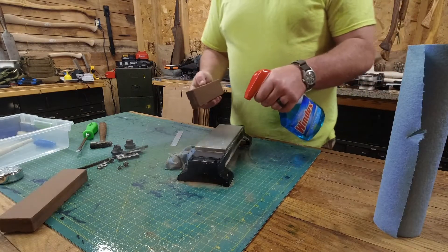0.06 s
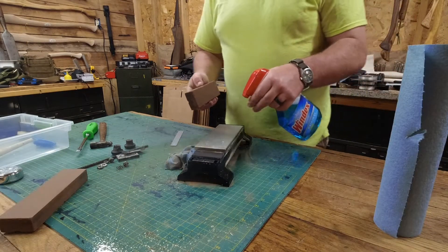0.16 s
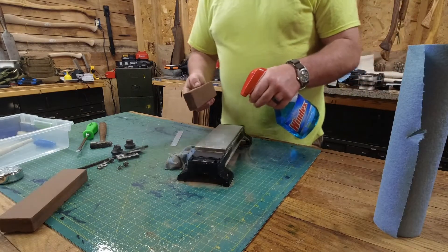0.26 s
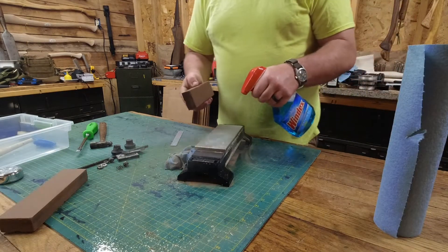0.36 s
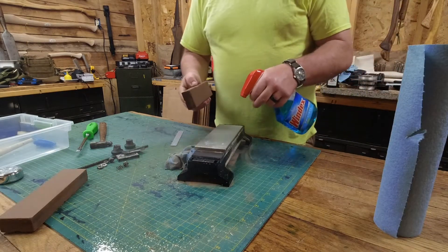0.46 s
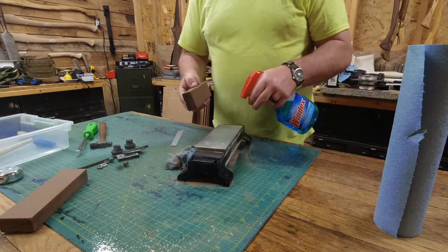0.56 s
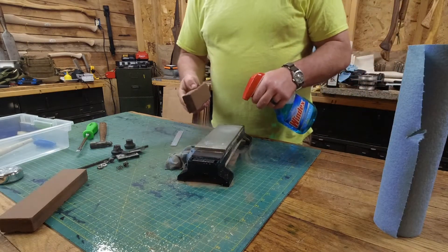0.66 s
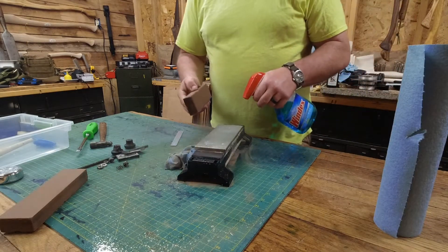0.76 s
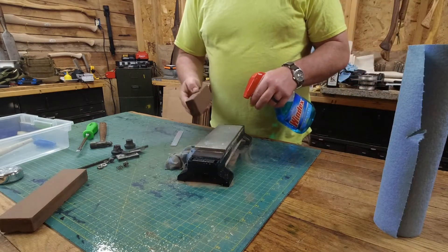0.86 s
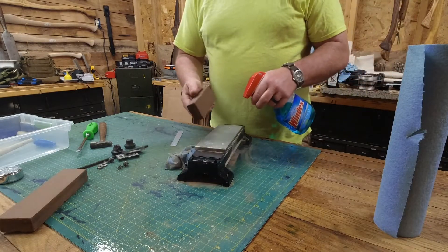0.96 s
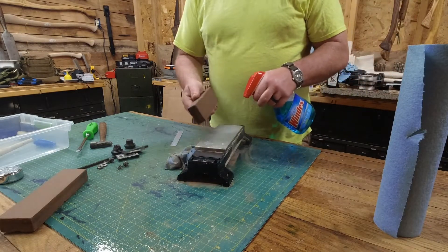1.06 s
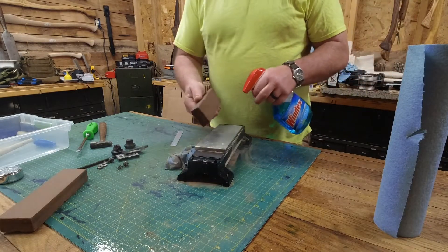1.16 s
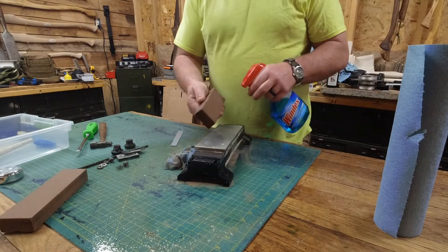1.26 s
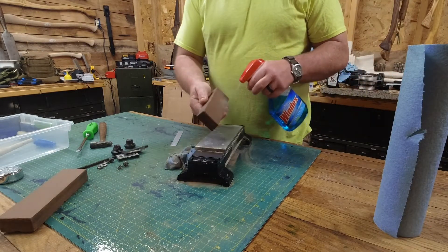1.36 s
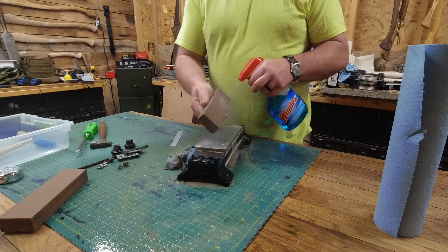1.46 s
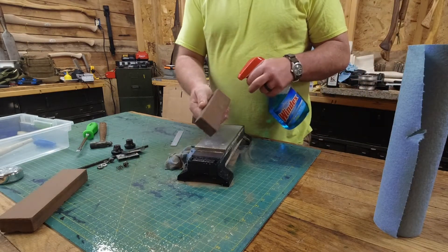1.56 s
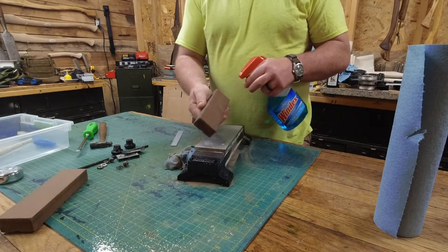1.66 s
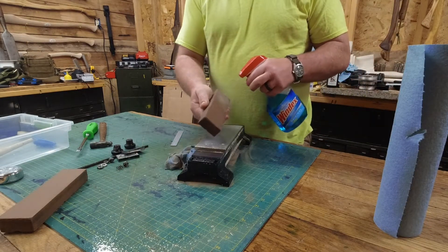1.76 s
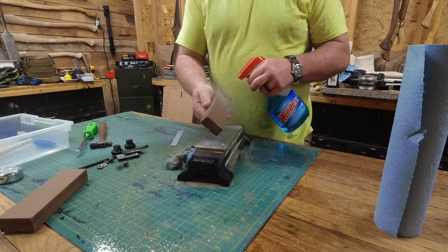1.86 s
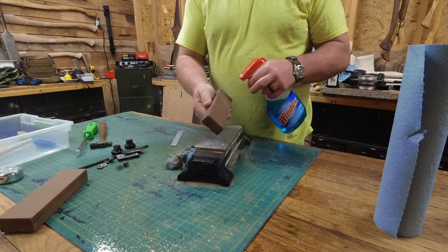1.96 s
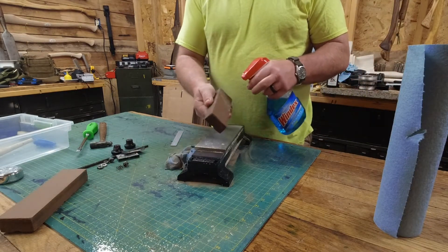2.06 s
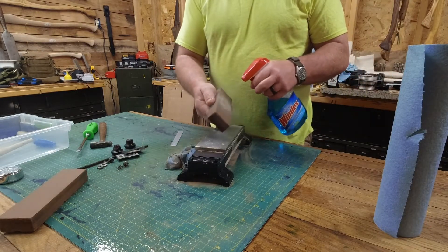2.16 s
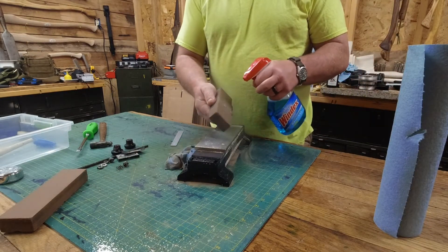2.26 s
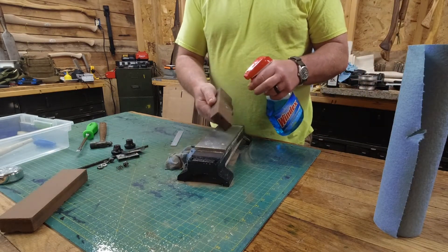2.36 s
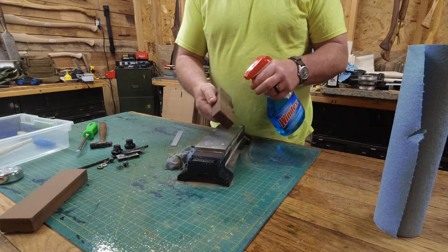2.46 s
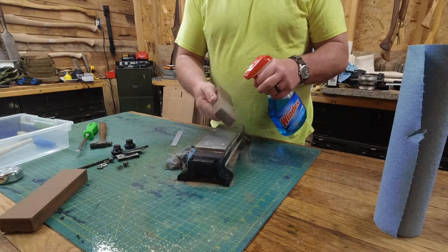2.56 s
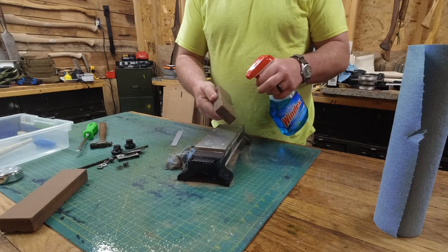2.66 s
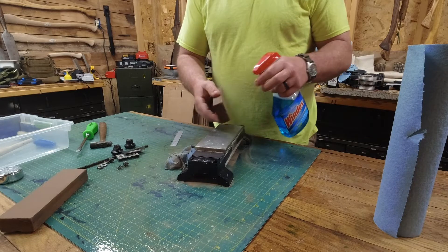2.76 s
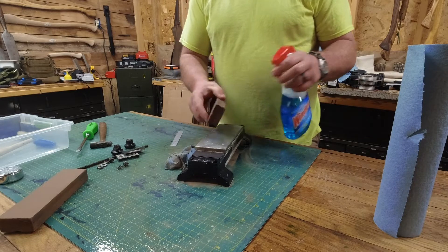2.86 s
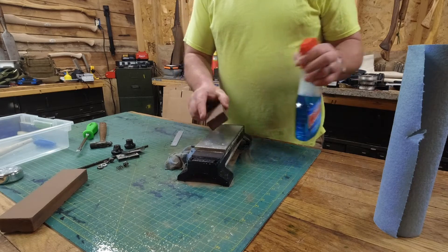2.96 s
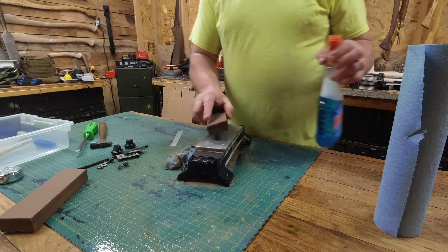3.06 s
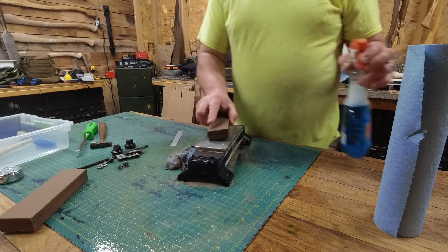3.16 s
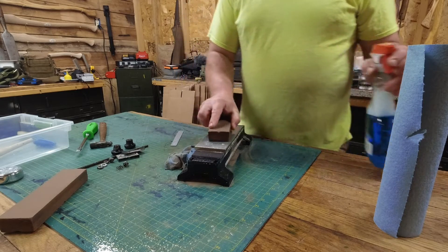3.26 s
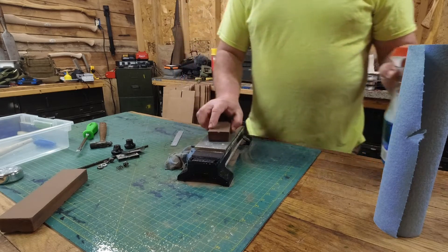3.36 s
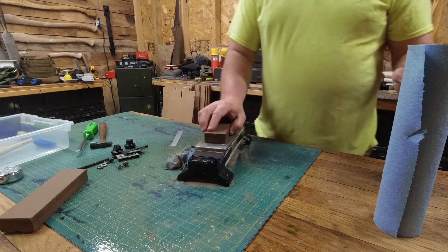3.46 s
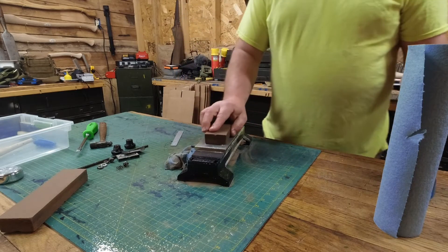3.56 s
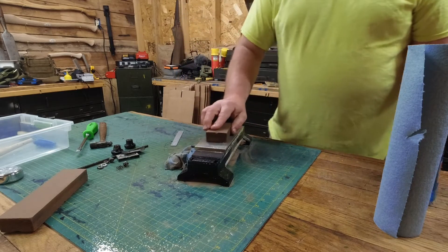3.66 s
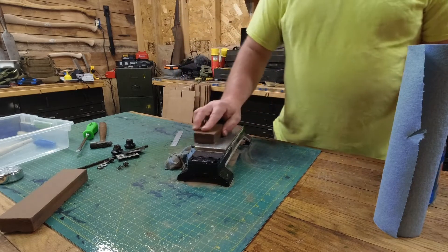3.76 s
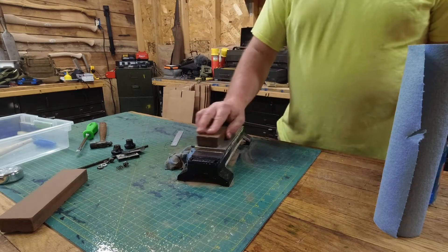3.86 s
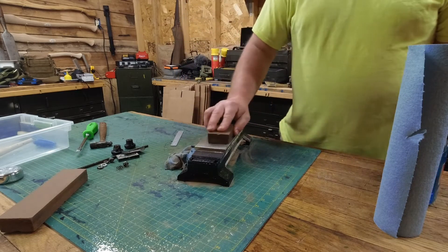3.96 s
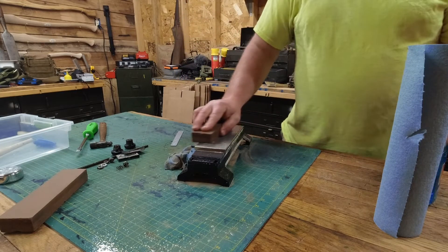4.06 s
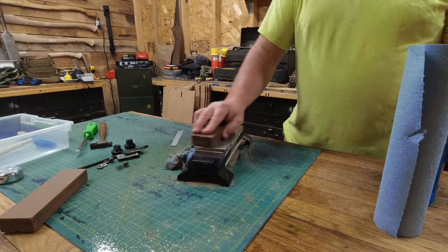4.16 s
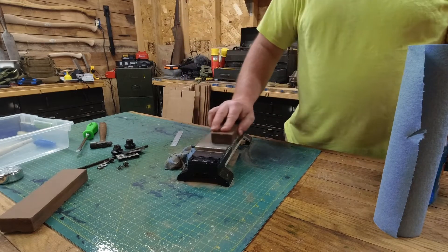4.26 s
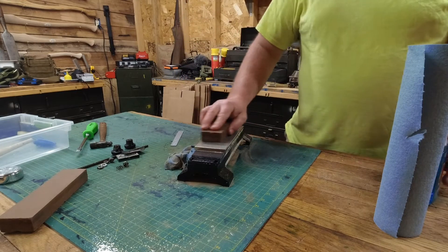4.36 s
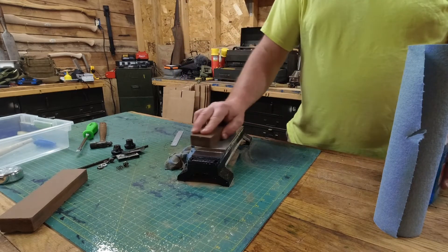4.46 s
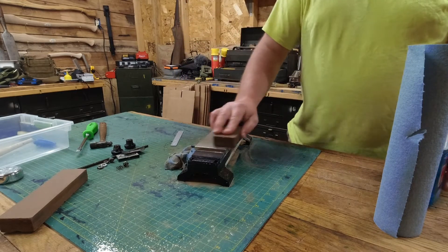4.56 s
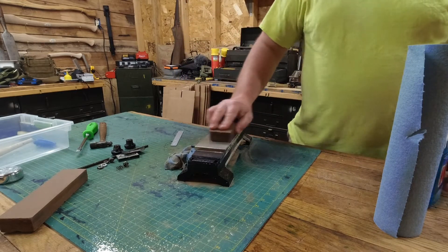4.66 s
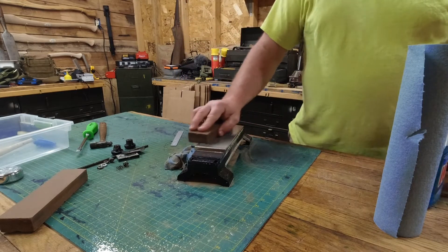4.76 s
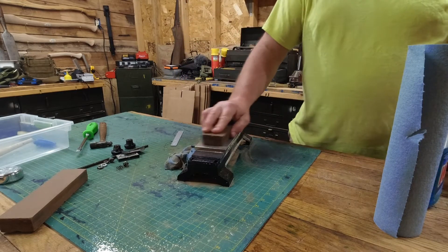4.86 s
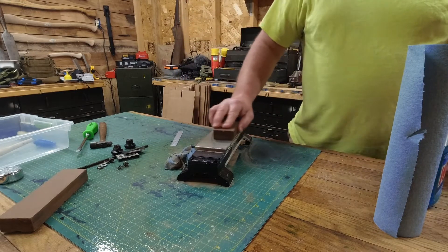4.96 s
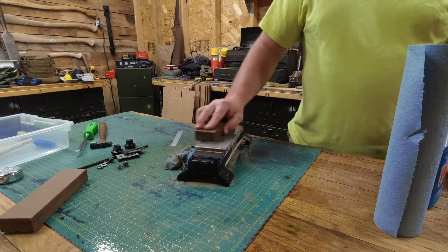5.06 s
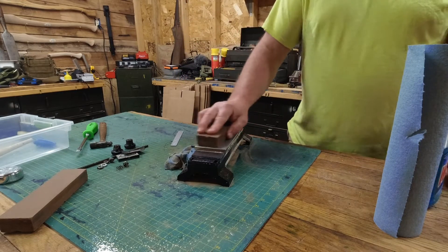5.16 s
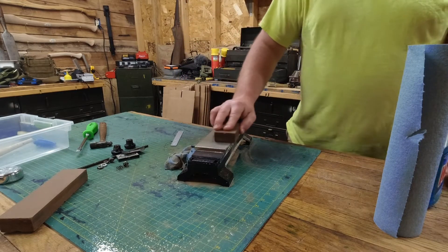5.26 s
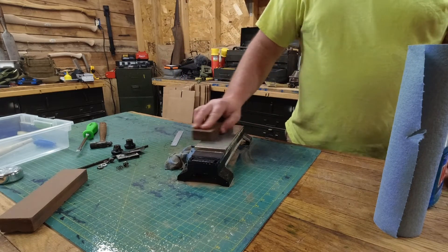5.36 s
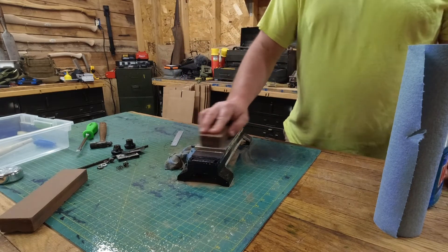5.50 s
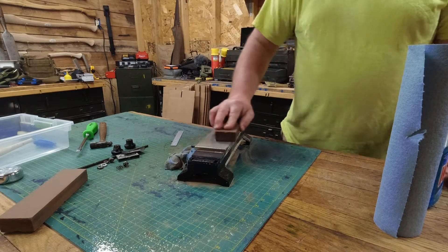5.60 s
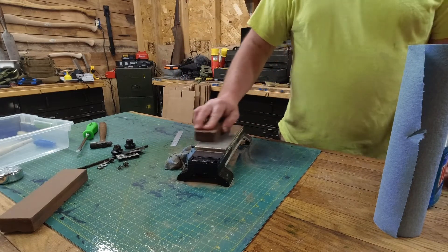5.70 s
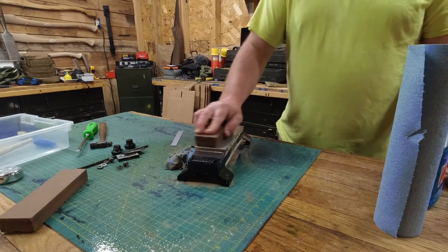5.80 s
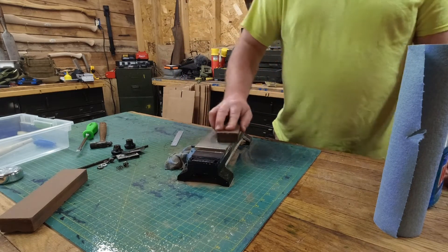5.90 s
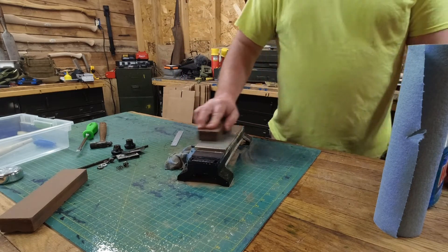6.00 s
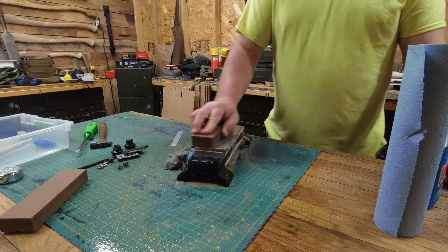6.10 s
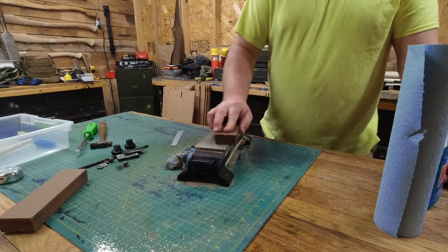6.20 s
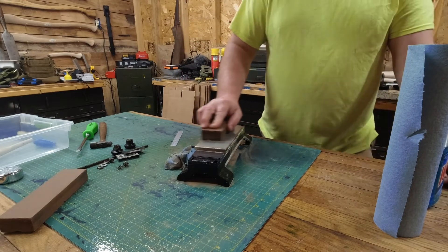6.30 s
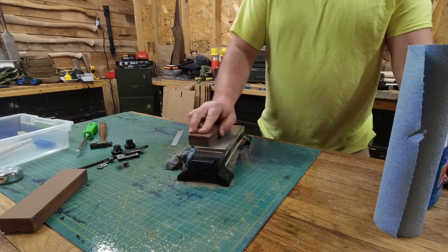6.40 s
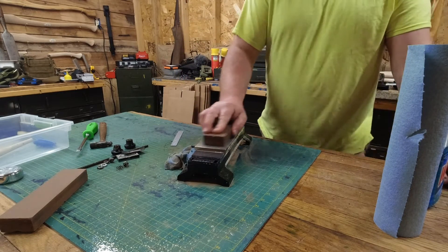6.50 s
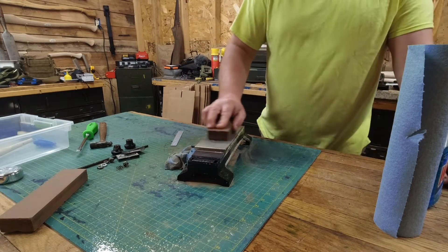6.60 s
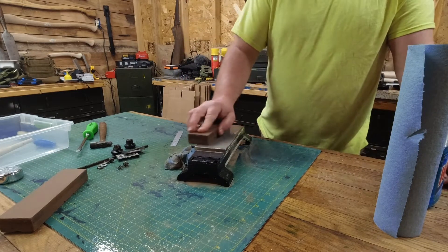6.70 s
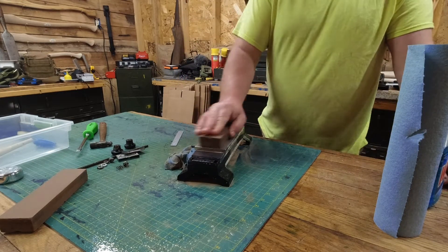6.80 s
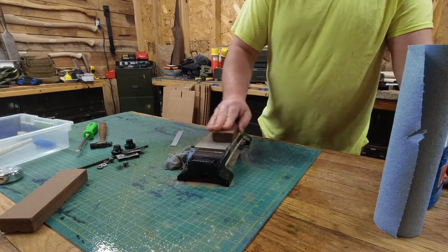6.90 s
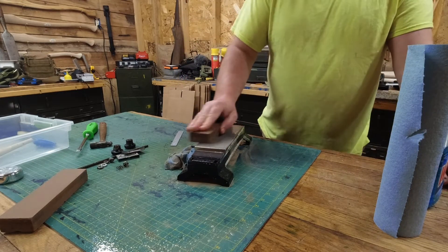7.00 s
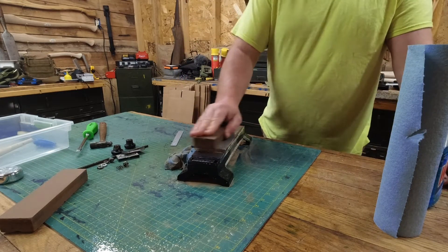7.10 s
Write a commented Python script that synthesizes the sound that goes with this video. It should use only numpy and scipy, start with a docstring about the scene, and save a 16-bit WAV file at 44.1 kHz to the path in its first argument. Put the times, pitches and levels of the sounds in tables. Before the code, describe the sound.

Quick hissing squirts from a plastic trigger bottle, followed by knocks and the rhythmic rasp of a stone rubbed on a wet steel plate.

```python
"""A trigger bottle hisses and clacks close to the microphone, pumped eight times in a wooden workshop:
each pull tears mist from the nozzle, each release throws the lever against its stop.
Then a stone is tapped down on a wet steel plate and scrubbed in circles; its grit rings the plate.
The bottle lands on a bench nearby. The building hums low under it all; the stereo image
widens towards the treble."""
import sys
import numpy as np
from scipy import signal
from scipy.fft import rfft, irfft, next_fast_len
from scipy.io import wavfile
from scipy.ndimage import uniform_filter1d

SR = 44100
rng = np.random.default_rng(int(sys.argv[2]) if len(sys.argv) > 2 else 0)


def master(y):
    """Save y as 16-bit WAV."""
    cut = np.clip(np.atleast_2d(y).T, -1, 1)
    pcm = np.round(cut * 32767)  # scale
    wavfile.write(sys.argv[1], SR, pcm.astype(np.int16))


N = 314874


def gain_of(db):
    """Decibels to amplitude."""
    return 10 ** (np.asarray(db) / 20)


def unit_rms(x):
    """Scales to rms 1."""
    return x / np.sqrt(np.mean(x ** 2) + 1e-20)


def unit_peak(x):
    """Scales to peak 1."""
    return x / abs(x).max()


def curve_at(points, hz):
    """Reads a curve on a log frequency axis."""
    f, value = np.transpose(points)
    return np.interp(np.log(hz + 1), np.log(f + 1), value)


def colour(x, points):
    """Filters by a curve of (f/Hz, gain/dB) points."""
    size = next_fast_len(len(x) + SR // 10)
    response = gain_of(curve_at(points, np.fft.rfftfreq(size, 1 / SR)))
    return irfft(rfft(x, size) * response, size)[:len(x)]


def add(mix, s, sound):
    """Mixes a sound in at s seconds."""
    part = mix[round(s * SR):][:len(sound)]
    part += sound[:len(part)]


def ring(x, hz, width):
    """One mode, gain 1 at its centre."""
    return signal.lfilter(*signal.iirpeak(hz, hz / width, SR), x)


def glide(x, hz, width):
    """A moving resonance: shift the curve hz down to zero, smooth twice, shift back."""
    carrier = np.exp(2j * np.pi * np.cumsum(hz) / SR)
    r = np.exp(-np.pi * width / SR)
    return 2 * (carrier * signal.lfilter([(1 - r) ** 2], [1, -2 * r, r * r], x / carrier)).real


def drift(n, seconds):
    """Smooth random wander of rms 1."""
    span = max(round(seconds * SR), 2)
    return unit_rms(uniform_filter1d(uniform_filter1d(rng.standard_normal(n), span), span))


LEAD_S = .004  # silence ahead of each blow
def blow(contact_s, length_s=.3, rattle_db=-60, rattle_s=.03):
    """A contact force: a short dying crunch, then loose parts rattling on."""
    t = np.maximum(np.arange(round(length_s * SR)) / SR - LEAD_S, 0)
    crunch = t / contact_s * np.exp(1 - t / contact_s)
    rattle = gain_of(rattle_db) * np.exp(-t / rattle_s) * np.tanh(t / 0.0058)
    return rng.standard_normal(len(t)) * (crunch + rattle)


# Room tone of the workshop: f/Hz, relative level/dB
HUM_SPECTRUM = [(20, -33.5), (35, -6.5), (48, 0), (62, -19.5), (85, -26.5), (200, -26.5), (600, -30),
                (1200, -33.5), (3500, -36), (5000, -46), (8000, -56.5), (12000, -100)]
# Its slow rise and fall: t/s, level/dB
HUM_LEVELS = [(0.0, -48.5), (0.4, -51.5), (1.24, -54), (1.8, -55.5), (2.3, -53), (2.8, -52.5),
              (3.15, -60.5)]
def building_hum():
    """Low rumble and faint air noise, behind everything else."""
    level_db = np.interp(np.arange(N) / SR, *np.transpose(HUM_LEVELS)) + 1.3 * drift(N, 0.15)
    return gain_of(level_db) * unit_rms(colour(rng.standard_normal(N), HUM_SPECTRUM))


# Decay of the wooden room: f/Hz, t60/s before t60_scale
ROOM_DECAY = [(150, 0.37), (400, 0.2), (1000, 0.3), (3000, 0.18), (6000, 0.19), (11000, 0.2)]
def room_echoes(sound, t60_scale, start_s):
    """The walls return sparse echoes of random sign, each band dying at its own speed."""
    taps = np.zeros(SR // 2)
    at = np.arange(round(start_s * SR), len(taps) - 20, 20)
    taps[at + rng.integers(0, 20, len(at))] = rng.choice([-1., 1.], len(at))
    hz, t, bands = signal.stft(taps, SR, nperseg=256)
    t60 = t60_scale * curve_at(ROOM_DECAY, hz)
    tail = signal.istft(bands * gain_of(-60 * t / t60[:, None]), SR, nperseg=256)[1]
    return signal.fftconvolve(sound, tail / np.linalg.norm(tail))[:N]


# Modes of the bench top: f/Hz, width/Hz, level/dB
BENCH_MODES = [(59, 13, -3), (82, 31, -9), (138.5, 22, -5.5), (250, 46, 1), (333, 29, -3.5)]
def bench_thud():
    """A dull blow makes the bench top boom."""
    force = colour(abs(blow(0.0032)), [(35, -43), (70, -1.5), (400, -12.5), (1300, -37), (16000, -78)])
    return unit_peak(sum(gain_of(db) * unit_peak(ring(force, hz, w)) for hz, w, db in BENCH_MODES))


# Blows on the bench nearby: t/s, peak level/dB
BENCH_BLOWS = [(3.15, -43.5), (3.627, -14.5), (3.669, -20), (3.801, -26)]
def bottle_landing():
    """A faint bump, then the bottle comes down on the bench in three thuds."""
    out = np.zeros(N)
    for s, db in BENCH_BLOWS:
        add(out, s - LEAD_S, gain_of(db) * bench_thud())
    return out


# Hiss close to the nozzle: f/Hz, relative level/dB
JET_SPECTRUM = [(200, -18.5), (350, -8), (640, -1.5), (1000, -9.5), (1500, -10.5), (2700, -6.5),
                (4300, -7.5), (5900, -20), (8000, -14.5), (9400, -8), (11300, -20.5), (13200, -14.5),
                (14400, -16), (16000, -15.5)]
# Trigger pulls: full pressure t/s, level/dB, build-up/s
PULLS = [(0.05, -45, 0.079), (0.41, -47, 0.073), (0.77, -48.5, .09), (1.12, -46, 0.066),
         (1.501, -47, 0.078), (1.899, -45.5, 0.067), (2.26, -46, 0.079), (2.63, -48.5, 0.074)]
def spray():
    """Mist tears out of the nozzle, fluttering as droplets break up; pressure builds, holds and sags."""
    build_db, sag_db, sag_s = 20, 35, 0.097  # fall at build_s before and sag_s after full pressure
    out = np.zeros(N)
    for s, db, build_s in PULLS:
        start = max(s - .16, 0)
        t = np.arange(start - s, .17, 1 / SR)
        mist = unit_rms(colour(rng.standard_normal(len(t)), JET_SPECTRUM))
        flutter_db = 0.71 * drift(len(t), 0.0042)
        lost_db = np.where(t < 0, build_db * (abs(t) / build_s) ** 4.3, sag_db * (abs(t) / sag_s) ** 3.03)
        add(out, start, mist * gain_of(db + flutter_db - lost_db))
    return out


# Modes of the hollow bottle: f/Hz, width/Hz, level/dB
BOTTLE_MODES = [(110, 200, -11), (189, 220, 6.5), (360, 160, 1), (500, 260, 1.5), (600, 73, -1),
                (1150, 95, 5.5), (1550, 250, -3), (1940, 290, -6)]
# Its belly knocks louder as the pumping goes on: t/s, gain/dB
BELLY_GAINS = [(.2, -12), (1.1, -7.5), (2.6, -6)]
# The dull plastic lever, its bright snap and the airy top, each: f/Hz, gain/dB
LEVER_SPECTRUM = [(800, -16), (1800, -10.5), (4500, 1.5), (5500, -26.5), (9000, -41), (16000, -92)]
SNAP_SPECTRUM = [(4000, -25), (5600, 0), (6800, -5), (8500, -12), (10800, -17), (12000, -60)]
AIR_SPECTRUM = [(9500, -50), (10800, -2), (13000, 0), (16000, -6)]
# Clacks at close range: t/s, level/dB, lever f/Hz, then relative levels/dB: liquid, neck, snap, air, rattle
LEVER_HITS = [(0.175, -40, 3120, -1.5, -23, -3, -15, 6), (0.1947, -15, 1870, -14.5, -6, -6, -5, -13.5),
              (0.2258, -16, 3110, -11, -5, -12, -33, -25), (0.2982, -39, 2000, -11, -6, -4, -34, -15),
              (0.5509, -30, 2470, -2, -9, -14, -35, -10), (0.578, -28.5, 2630, 1, -1, -5.5, -10, -19),
              (0.6411, -33, 2880, -27, -5, -12.5, -44, -7), (0.904, -43, 3320, 2, -29, -33, -64, -5),
              (0.9481, -27, 2720, -10, -13, -23, -72, -14), (0.9559, -21, 3180, -21, -30, -47, -80, -29),
              (1.0075, -37, 3380, -10, -7, -19, -51, -13), (1.265, -41, 3260, -17, -13, -24, -49, -3),
              (1.3041, -25.5, 2520, -37, -16, -16, -46, -14),
              (1.3116, -14.5, 3110, -45, -21, -10, -52, -20.5),
              (1.6487, -44, 1800, -0.5, -10, -40, -67, -11.5),
              (1.695, -20.5, 3270, -38, -20, -35, -78, -39), (1.773, -38, 3760, -23, -8, -46, -67, -15),
              (2.041, -48, 3620, -19, -7, -45, -60, -6.5), (2.0856, -22.5, 3120, -36, -13, -33, -82, -28),
              (2.1305, -37, 2750, -25, -5.5, -40, -64, -6.5),
              (2.401, -44.5, 3070, -27, -11, -12, -38, -0.5), (2.4415, -14.5, 2950, -49, -18, -6, -48, -16),
              (2.7868, -48, 3700, -24, -5.5, -12, -60, -1),
              (2.8288, -16.5, 2630, -44, -10.5, -7, -65, -23.5)]
def trigger_clacks():
    """The lever strikes its stop: a plastic ring, a snap and a knock in the hollow bottle."""
    borders_hz = [250, 900]  # between liquid, belly and neck modes
    out = np.zeros(N)
    for s, db, hz, liquid_db, neck_db, snap_db, air_db, rattle_db in LEVER_HITS:
        force = blow(0.0014, rattle_db=rattle_db, rattle_s=0.034)
        lever = unit_peak(ring(force, hz, width=600)) + 0.39 * unit_peak(force)
        lever = unit_peak(colour(lever, LEVER_SPECTRUM))
        belly_db = np.interp(s, *np.transpose(BELLY_GAINS))
        part = gain_of([liquid_db, belly_db, neck_db])
        knock = sum(gain_of(mode_db) * part[np.searchsorted(borders_hz, f)] * unit_peak(ring(force, f, w))
                    for f, w, mode_db in BOTTLE_MODES)
        knock = colour(knock, [(2500, -0.5), (6000, -69), (16000, -79)])
        snap = gain_of(snap_db) * unit_peak(colour(force, SNAP_SPECTRUM))
        air = gain_of(air_db) * unit_peak(colour(force, AIR_SPECTRUM))
        add(out, s - LEAD_S, gain_of(db) * (lever + knock + snap + air))
    return out


# Modes of the wet steel plate: f/Hz, base width/Hz, rubbed level/dB, struck level/dB
PLATE_MODES = [(643, 110, -13, -22), (778, 68, -13, -30), (954, 84, -10.5, -27), (1150, 117, -7.5, 1),
               (1262, 73, -8, -6), (1505, 55, -12.5, -18), (1507, 40, -4.5, -21), (1593, 65, -3.5, -9),
               (1653, 86, -11, 1.5), (2250, 300, -10, -16), (2380, 108, -4.5, -16), (2504, 73, -9.5, -23),
               (3074, 214, -8, -21), (3390, 200, -12, -23), (3522, 185, -10, 12.5), (3530, 280, -14, -4),
               (3700, 244, -9.5, -18), (4210, 300, -18.5, -35), (5755, 98, -18.5, -17),
               (6065, 130, -19, -4.5), (6080, 140, -24.5, -39), (8800, 293, 1.5, -20),
               (12380, 380, -30, -65), (12920, 110, -24.5, -64), (15580, 280, -28.5, -84)]
def struck_plate(force, high_db):
    """The stone bounces off, so the plate rings longer than under pressure."""
    free_damping = .14  # share of the base width
    return unit_peak(sum(
        gain_of(db + high_db * (hz > 5000)) * unit_peak(ring(ring(force, hz, free_damping * w), hz, 5.7 * w))
        for hz, w, _, db in PLATE_MODES))


# Stone on plate: t/s, level/dB, then relative levels/dB: ring, high modes, bench thud
STONE_HITS = [(3.201, -11.5, -6.5, -8, -3.5), (3.324, -9, -19, 9.5, -8.5)]
def stone_taps():
    """The stone lands twice: the contact cracks, the plate rings and the bench booms."""
    crack_spectrum = [(100, -27), (600, -0.5), (3800, -1.5), (4800, -25.0), (7000, -56), (16000, -110)]
    out = np.zeros(N)
    for s, db, ring_db, high_db, thud_db in STONE_HITS:
        force = blow(0.0018, rattle_db=-14.5, rattle_s=0.045)
        crack = unit_peak(colour(force, crack_spectrum))
        plate = gain_of(ring_db) * struck_plate(force, high_db)
        add(out, s - LEAD_S, gain_of(db) * (crack + plate + gain_of(thud_db) * bench_thud()))
    return out


def grit(n):
    """Dense collisions of uneven size, about 12000 a second."""
    size = gain_of(4.9 * np.minimum(rng.exponential(1, n), 3.0)) * rng.choice([-1., 1.], n)
    return unit_rms(size * (rng.random(n) < 12000 / SR))


FULL_SPEED_S, FALTER_S = 3.5, 3.645  # the stone is up to speed; it falters once
def sway(t, turn, swing, at, creep, swing_twice, at_twice):
    """Swings once and twice a circle, with crests at the given turns that creep in turns/s."""
    place = turn - creep * (t - FULL_SPEED_S)
    return swing * np.cos(2 * np.pi * (place - at)) + swing_twice * np.cos(4 * np.pi * (place - at_twice))


# Plain rasp of the grit: f/Hz, gain/dB
RASP_SPECTRUM = [(25, -44.5), (60, -15), (130, -20), (300, -22), (600, -21), (1500, -9), (2700, -22),
                 (3900, -18), (4700, -36), (6400, -26.5), (6900, -36), (10500, -37), (13300, -43),
                 (14200, -59), (16000, -64)]
# Circles of the stone, close up: start t/s, pressure level/dB,
# low, middle and high mode gains/dB, crest of the middle modes/turns
STONE_CIRCLES = [(3.36, -2.5, 2, -12.5, -30, 0.37), (3.659, -7.5, -3, -5, -26, 0.52),
                 (3.97, -4.5, -6, -6, -22.5, 0.64), (4.28, -5.5, -8.5, -4.5, -21, 0.41),
                 (4.62, -5.5, -8, -3, -17.5, 0.34), (4.96, -9, -3.5, -0.5, -17, 0.41),
                 (5.3, -8, -2, 0, -17, 0.43), (5.62, -9, -4, 0, -17, .42),
                 (5.95, -10, -1.5, 3, -15.5, 0.29), (6.29, -9.5, -0.5, 4, -22, 0.25),
                 (6.618, -9, -3.5, 0.5, -24, 0.26), (6.94, -9, -2.5, 2, -20, 0.32),
                 (7.27, -13.5, 7, -1.5, -26, 0.42)]
def stone_scrub():
    """Grit drives the plate; each mode swells as the stone crosses its crests."""
    starts, *columns = np.transpose(STONE_CIRCLES)
    t = np.arange(starts[0], N / SR, 1 / SR)
    n = len(t)
    turn = np.interp(t, starts, np.arange(len(starts)))
    press_db, low_db, middle_db, high_db, crest = (np.interp(t, starts, c) for c in columns)
    press_db -= 547 * np.maximum(FULL_SPEED_S - t, 0)  # fades in, dB/s
    press_db -= 11.5 * np.exp(-((t - FALTER_S) / 0.032) ** 2)

    base_db = sway(t, turn, 1.8, 0.49, 0.023, 0.26, 0.225)
    low_db += sway(t, turn, 3, -0.05, 0.25, 1.8, .12)
    rasp_db = 0.26 * middle_db + sway(t, turn, 0.98, 0.66, -0.027, 1.24, 0.108)
    middle_db += sway(t, turn - crest, 3, 0, 0, 0.3, .2)
    high_db += sway(t, turn, 4, 0.14, 0.05, 3, .09)
    family = gain_of([base_db, low_db, middle_db, rasp_db, high_db, rasp_db])
    borders_hz = [1950, 2750, 5000, 7000, 10000]  # between these mode families

    patches = grit(n), grit(n)  # neighbouring modes feel different patches of grit
    # the loaded stone's own ring climbs slowly and swings with each circle
    stone_hz = 3320 + 86 * (t - FULL_SPEED_S) + sway(t, turn, 320, .76, 0, 50, 0.32)
    stone = glide(glide(grit(n), stone_hz, width=960), stone_hz, width=1000)
    sound = gain_of(rasp_db) * colour(grit(n), RASP_SPECTRUM)
    sound += gain_of(middle_db - 7.5 + 1.7 * drift(n, 0.033)) * stone
    for i, (hz, w, db, _) in enumerate(PLATE_MODES):
        swell = gain_of(db + 2.1 * drift(n, 0.05)) * family[np.searchsorted(borders_hz, hz)]
        sound += swell * ring(ring(patches[i % 2], hz, 0.84 * w), hz, 5.1 * w)
    out = np.zeros(N)
    add(out, starts[0], gain_of(press_db + 0.56 * drift(n, 0.0092)) * sound)
    return out


# Colour of the microphone's side signal: f/Hz, gain/dB
SIDE_SPECTRUM = [(60, -20), (110, -27), (200, -28), (380, -23.5), (700, -22), (1290, -15.5), (2380, -7.5),
                 (4400, -0.5), (8120, 2.5), (15000, 0)]
def scene():
    """Near sources with the room behind them; left and right differ more as pitch rises."""
    hits = trigger_clacks() + stone_taps() + bottle_landing()
    mist, rubbing = spray(), stone_scrub()
    into_room = gain_of(-8.5) * (hits + rubbing) + gain_of(-11.5) * mist
    room = room_echoes(into_room, t60_scale=1.225, start_s=.006)
    mid = hits + mist + rubbing + room + building_hum()
    # sound thrown off in other directions
    sideways = room_echoes(hits, t60_scale=.5, start_s=.002) + spray() + stone_scrub()
    lagging = signal.hilbert(mid, next_fast_len(N))[:N].imag  # a quarter cycle behind the mid
    lagging = colour(lagging, [(1500, 3.0), (4000, -7.5), (12000, -7.5)])
    side = colour(.55 * sideways + 0.86 * lagging, SIDE_SPECTRUM)
    return np.array([mid + side, mid - side])


def record(dry):
    """The recorder cuts off the highest treble."""
    edge_hz = 15650
    lowpass = signal.firwin(511, edge_hz, window=("kaiser", 9), fs=SR)
    return signal.oaconvolve(dry, lowpass[None], "same")


dry = scene()
out = record(dry)
master(out)
```